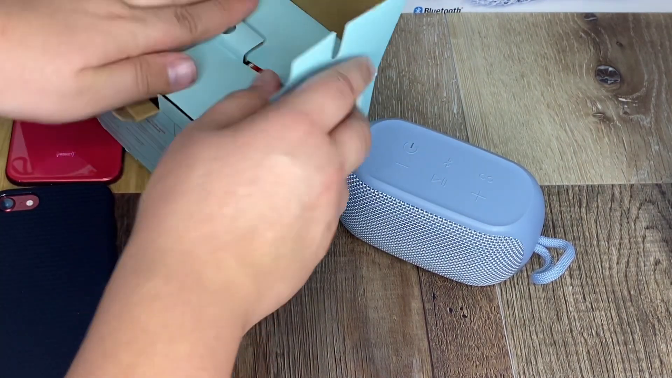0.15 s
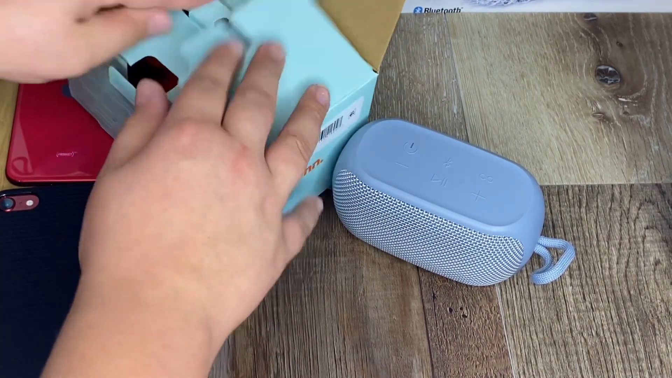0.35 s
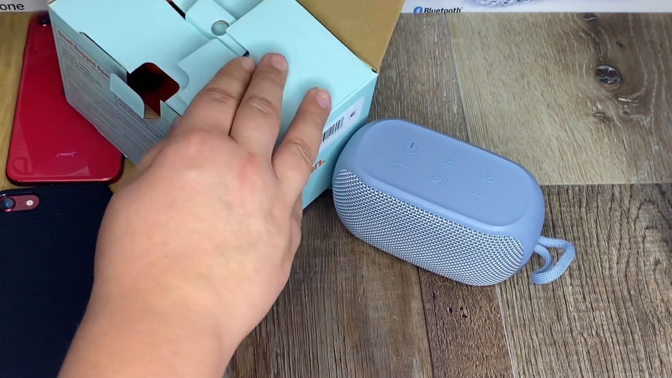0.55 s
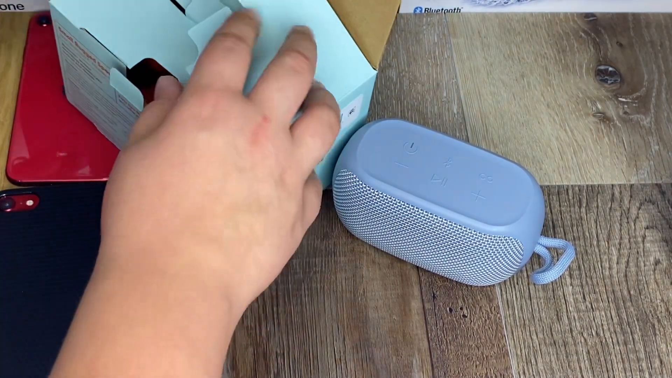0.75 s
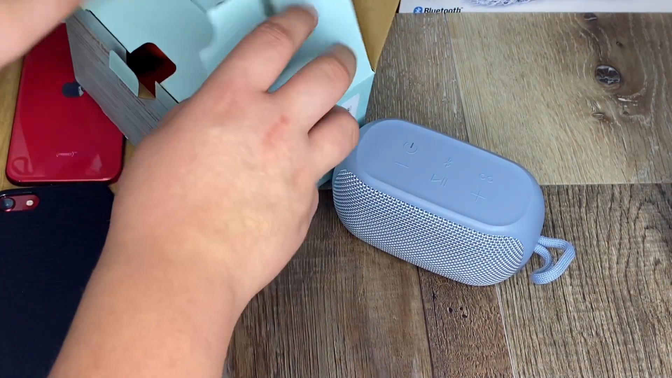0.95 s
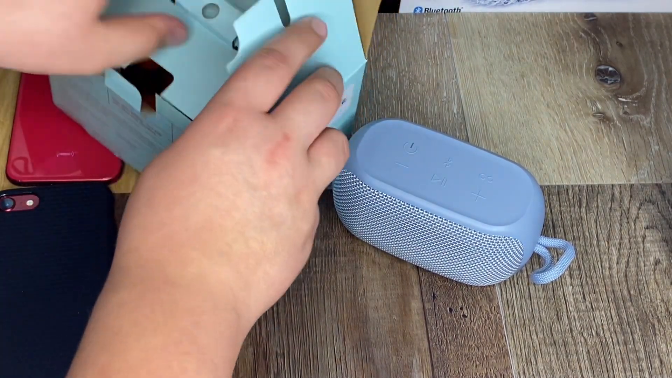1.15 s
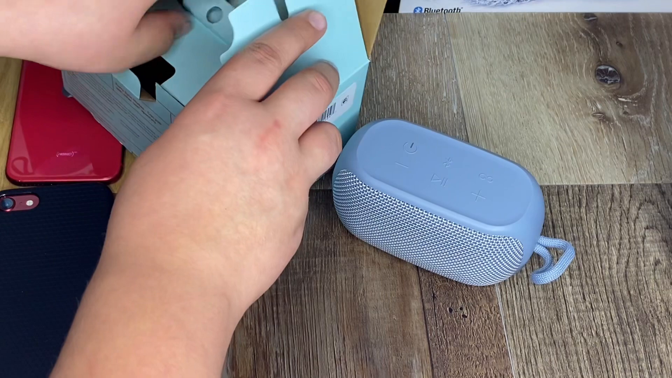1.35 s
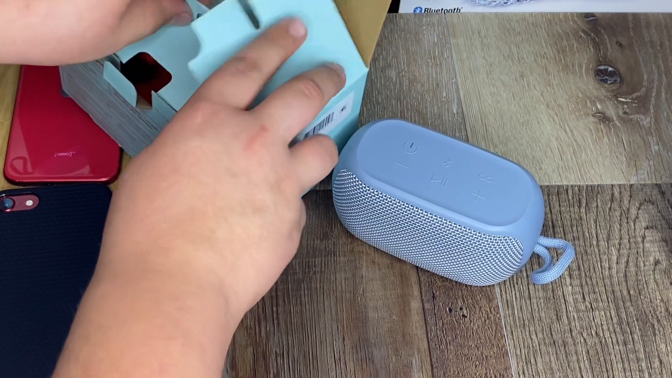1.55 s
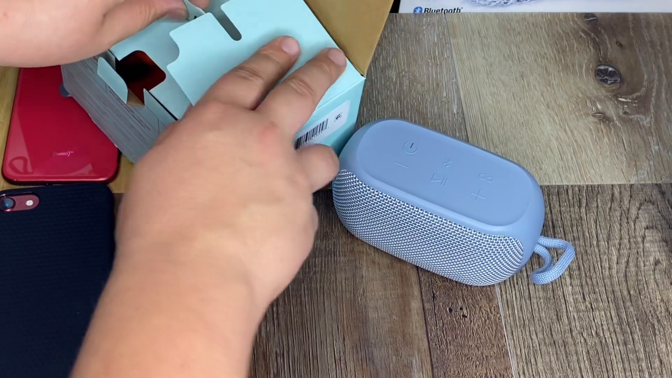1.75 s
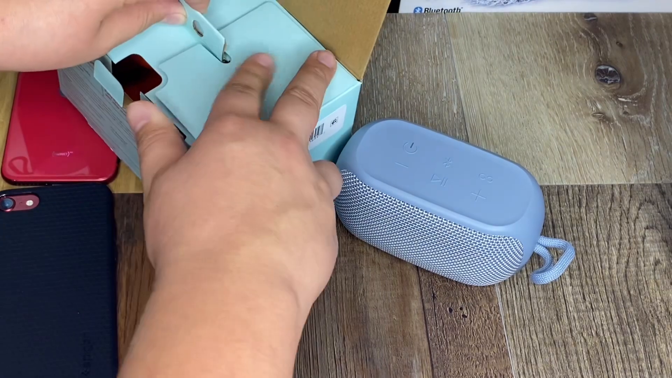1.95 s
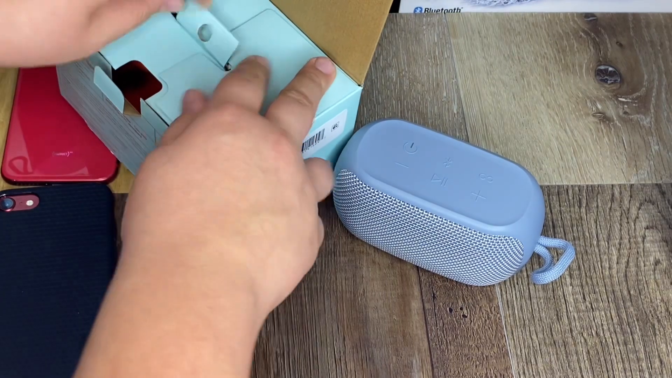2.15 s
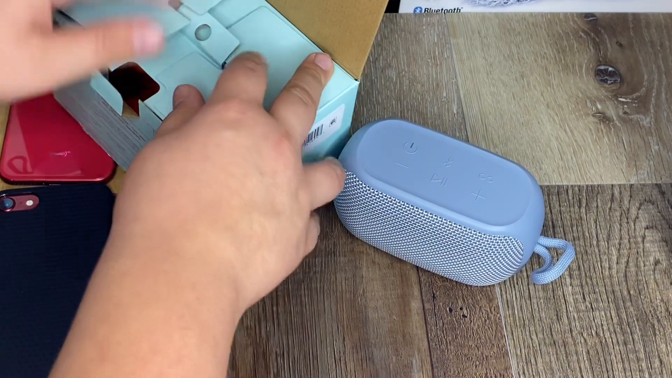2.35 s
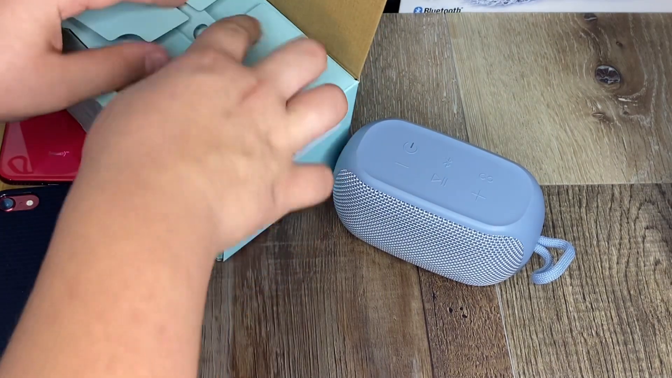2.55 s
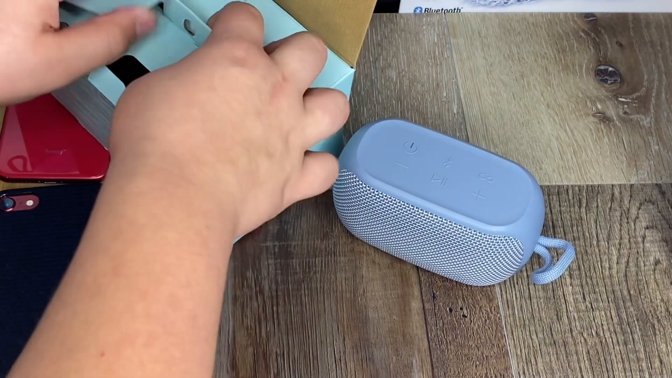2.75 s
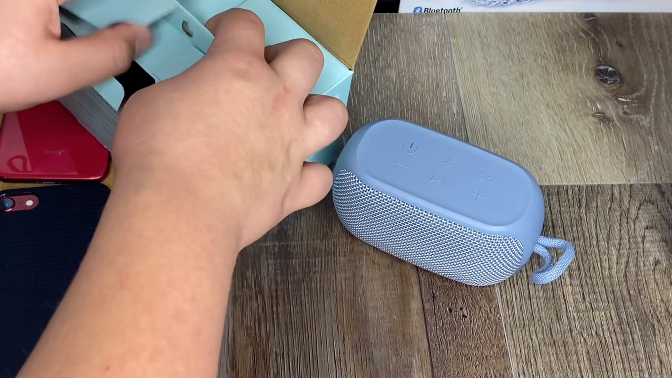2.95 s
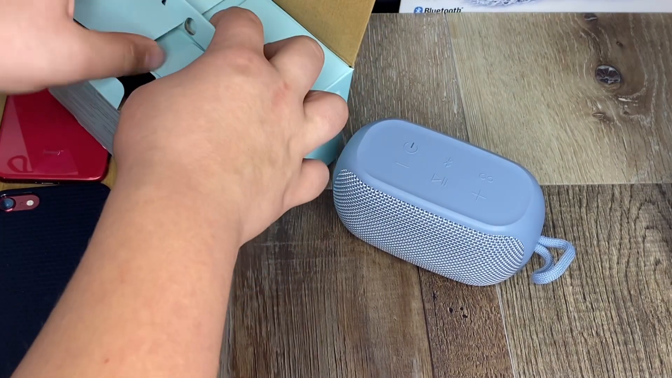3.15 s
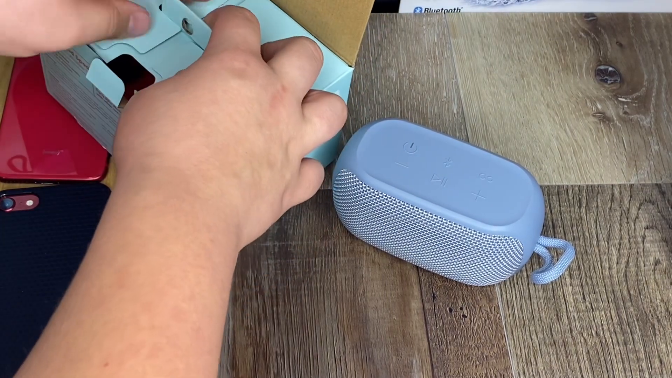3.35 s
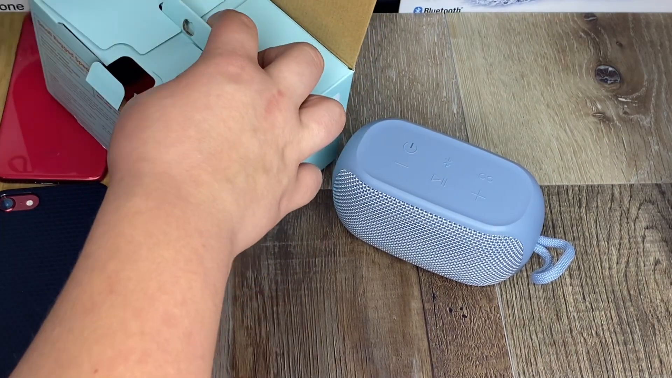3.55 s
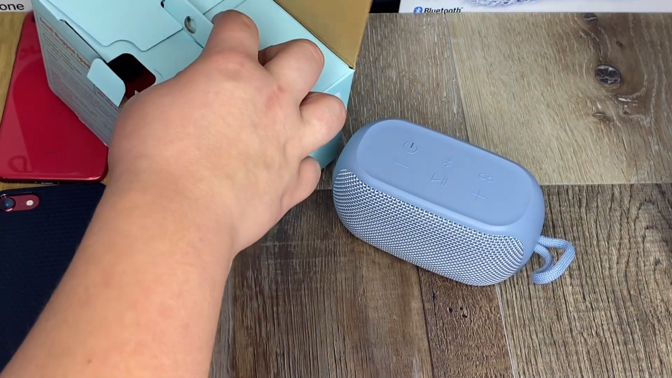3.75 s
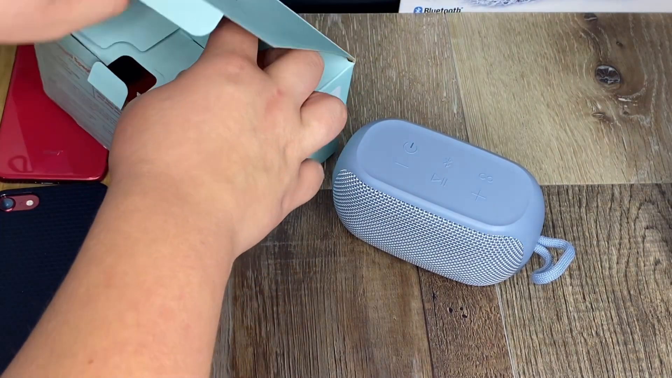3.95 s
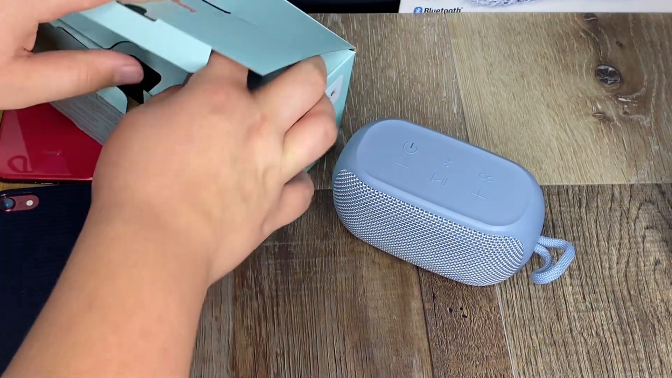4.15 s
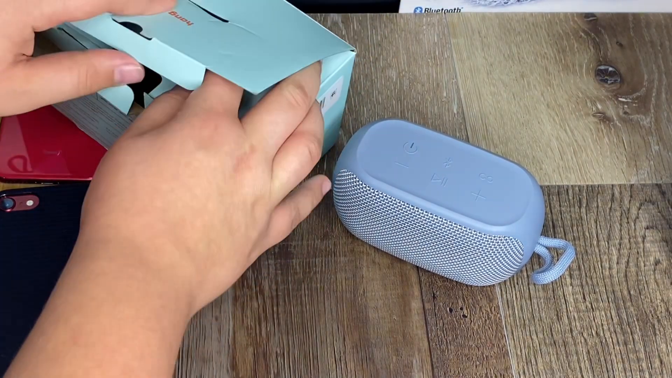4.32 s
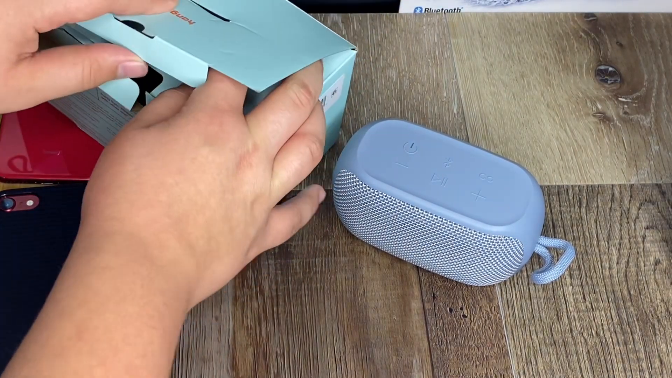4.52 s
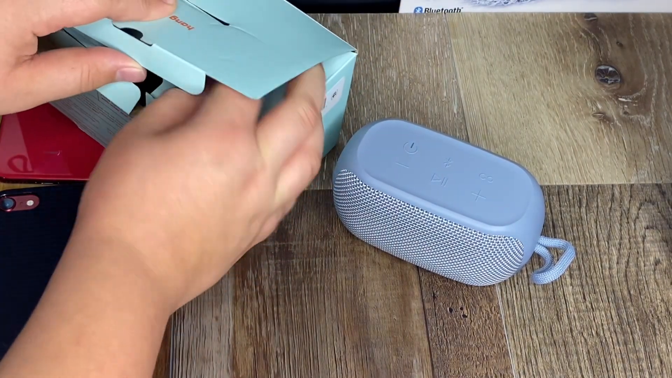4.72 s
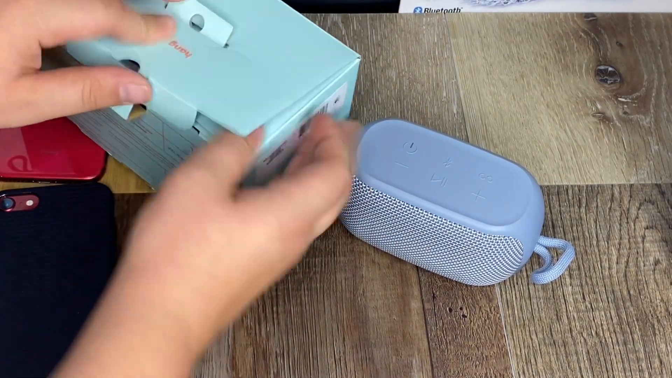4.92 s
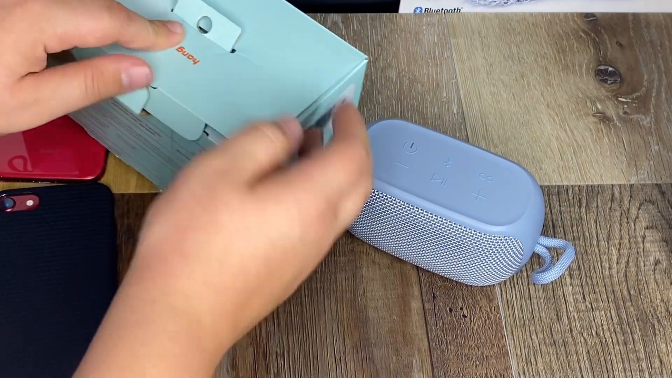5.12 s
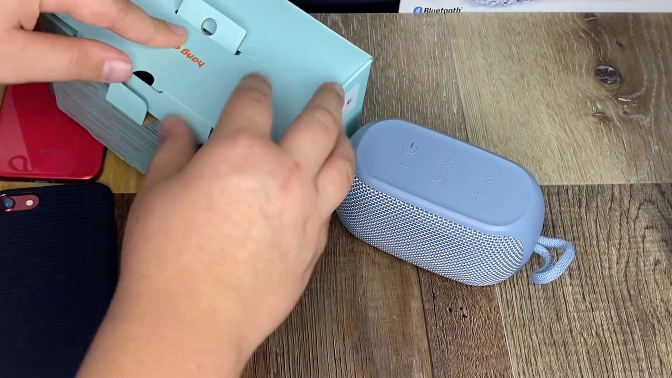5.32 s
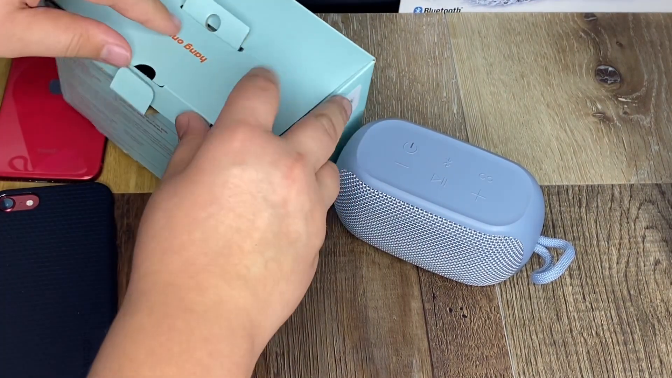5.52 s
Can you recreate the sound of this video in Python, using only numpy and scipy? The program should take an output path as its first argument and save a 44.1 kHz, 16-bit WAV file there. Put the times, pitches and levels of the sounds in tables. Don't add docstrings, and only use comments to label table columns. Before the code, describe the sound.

Close, dry cardboard rustling with small pops and hollow taps, a quiet fumbling pause, then a loud lid slap and faint creaks.

```python
import sys
import numpy as np
from scipy import signal
from scipy.fft import rfft, irfft, next_fast_len
from scipy.io import wavfile

SR = 44100
rng = np.random.default_rng(int(sys.argv[2]) if len(sys.argv) > 2 else 0)


def magnitude_from_level(level_db):
    exponent = np.asarray(level_db, float) / 20
    return 10 ** exponent


def wav_out(sig):
    wavfile.write(sys.argv[1], SR, np.round(np.clip(np.atleast_2d(sig).T, -1, 1) * 32767).astype(np.int16))


N = 250488


def rms_one(x):
    return x / np.sqrt(np.mean(x ** 2) + 1e-20)


def at_hz(points, hz):
    table_hz, values = np.array(points)[:, :2].T
    return np.interp(np.log(hz + 1), np.log(table_hz), values)


def colour(x, points):
    size = next_fast_len(len(x))
    gain = magnitude_from_level(at_hz(points, np.fft.rfftfreq(size, 1 / SR)))
    return irfft(rfft(x, size) * gain, size)[:len(x)]


def resonance(x, hz, width_hz):
    r = np.exp(-np.pi * width_hz / SR)
    poles = [1, -2 * r * np.cos(2 * np.pi * hz / SR), r * r]
    return signal.lfilter([(1 - r * r) / 2, 0, (r * r - 1) / 2], poles, x)


def body(x, modes):
    out = 0
    for k, (hz, width_hz, level_db) in enumerate(modes):
        out = out + (-1) ** k * magnitude_from_level(level_db) * resonance(x, hz, width_hz)
    return out


def drift(rate_hz):
    r = np.exp(-2 * np.pi * rate_hz / SR)
    wander = signal.lfilter([1], [1, -2 * r, r * r], rng.standard_normal(N + SR))
    return rms_one(wander[SR:])


def grains(per_s, spread_db, clump_db, clump_rate):
    sizes = magnitude_from_level(spread_db * np.minimum(rng.exponential(1, N), 4)) * rng.choice([-1, 1], N)
    slips = rng.random(N) < per_s / SR
    return sizes * slips * magnitude_from_level(clump_db * drift(clump_rate)) + 1e-18


def add(out, start_s, peak_db, sound):
    i = round(start_s * SR)
    piece = sound[:N - i]
    out[..., i:i + len(piece)] += np.multiply.outer(magnitude_from_level(peak_db) / np.max(np.abs(sound)), piece)


def burst(carrier, length_ms, rise):
    t = np.arange(len(carrier)) / (SR * max(length_ms, 0.4) / 1000)
    return carrier * (1 - np.exp(-(t / rise) ** 2)) * np.exp(-t * 1.12)


def strokes(rows, power_db, fade_db_per_s):
    start_s, hold_s = np.transpose(rows)[:2, :, None]
    t = np.arange(0, N + 64, 64) / SR - start_s
    grip = np.clip(t / 0.014, 0, 1)
    shape = grip * magnitude_from_level(power_db[:, None] - fade_db_per_s * np.maximum(t - hold_s, 0))
    return shape ** 2 + 1e-14


def spread(slow):
    return np.interp(np.arange(N) / 64, np.arange(len(slow)), slow)


# pitch_hz, level_db (per Hz)
AIR = [(25, -21), (38, -30), (59, 0), (102, -23), (114, -1), (206, -28.5), (775, -33.5), (840, -46),
       (2200, -41), (4500, -52), (16000, -62)]
# pitch_hz, width_hz, level_db, steady_share
HUM = [(58, 14, -61, .3), (91.3, 5, -56.5, 2.2)]


def background():
    out = magnitude_from_level(-63.5) * rms_one(colour(rng.standard_normal(N), AIR))
    for hz, width_hz, level_db, steady in HUM:
        flutter = rms_one(resonance(rng.standard_normal(N + SR), hz, width_hz)[SR:])
        tone = np.sin(2 * np.pi * hz * np.arange(N) / SR)
        out += magnitude_from_level(level_db) * rms_one(flutter + steady * tone)
    return out


# pitch_hz, t60_s
ROOM_T60 = [(100, 0.55), (500, 0.33), (2000, 0.25), (6000, 0.17), (14000, 0.15)]


def room(x, onset_s):
    t, tail = np.arange(SR * 3 // 4) / SR, 0
    for hz in 45 * 2. ** np.arange(9):
        octave = signal.butter(2, [hz / np.sqrt(2), hz * np.sqrt(2)], "band", fs=SR, output="sos")
        decay = magnitude_from_level(-60 * t / at_hz(ROOM_T60, hz) - 0.51 * np.log2(hz / 500))
        tail = tail + signal.sosfilt(octave, rng.standard_normal(len(t))) * decay
    tail = tail * (1 - np.exp(-t / onset_s))
    return signal.fftconvolve(x, tail / np.sqrt(np.sum(tail ** 2)))[:N]


def scatter(x, spread_s):
    t = np.arange(SR // 20) / SR
    echoes = rfft(rng.standard_normal(len(t)) * np.exp(-t / spread_s), N)
    lag = np.tanh(2 * np.cos(np.angle(echoes)))
    moving = 0.35 + 0.74 * np.tanh(2 * drift(7.8))
    return moving * irfft(1j * rfft(x) * lag, N)


# start_s, peak_db, pitch_hz, t60_s
THUMPS = [(0.08, -46, 127, 0.2), (0.963, -48, 91, 0.25), (1.124, -45, 145, 0.32), (1.879, -44.5, 106, 0.11),
          (2.167, -37, 138, 0.057), (2.341, -41, 143, 0.28), (3.257, -48.5, 147, 0.41),
          (3.71, -31.5, 138.7, 0.16), (3.843, -35.5, 171, 0.2), (4.697, -44, 134, 0.71),
          (4.925, -49, 156, 0.21),
          (1.26, -51, 137, 0.12),
    (1.896, -47, 56.7, 0.13),
    (3.719, -44, 51.8, 0.32),
    (3.873, -40, 44.8, 0.1),
    (4.932, -29.5, 112.4, 0.11),
    (4.952, -34.5, 55, 0.065),
]


def thumps():
    out, t = np.zeros(N), np.arange(SR // 2) / SR
    for start_s, peak_db, hz, t60_s in THUMPS:
        swell = 1 - np.exp(-t / 0.007)
        decay = magnitude_from_level(-60 * t / max(t60_s, 0.03))
        add(out, start_s, peak_db, np.sin(2 * np.pi * hz * t) * swell * decay)
    return out


# start_s, hold_s, level_db, pitch_hz, width_hz
SLIDES = [(-.01, 0.057, -45, 2500, 900), (0.81, 0.018, -64, 5270, 400), (1.844, 0.023, -48, 4700, 400),
          (2.151, 0.021, -46, 2560, 500), (2.331, 0.025, -42.5, 1300, 448), (2.957, .03, -65, 5470, 300),
          (3.067, 0.069, -55, 4240, 1400), (3.36, 0.031, -51.5, 7600, 900), (3.48, 0.13, -77.5, 1890, 1180),
          (3.884, 0.036, -47, 2750, 400), (3.954, 0.09, -64, 4700, 400), (4.872, 0.025, -46.5, 6500, 694),
          (4.963, 0.1, -54.5, 2180, 1800), (5.145, 0.027, -58.5, 4500, 700), (5.23, 0.078, -64, 4440, 500)]


def slides():
    powers = strokes(SLIDES, np.transpose(SLIDES)[2], fade_db_per_s=840)
    fine = grains(9000, spread_db=1.5, clump_db=3.5, clump_rate=40)
    out = np.zeros(N)
    for (_, _, _, hz, width_hz), power in zip(SLIDES, powers):
        patch = resonance(resonance(fine, hz, width_hz), hz, 2 * width_hz)
        out += spread(np.sqrt(power)) * rms_one(patch)
    return out


# pitch_hz, width_hz, level_db
BOX = [(285, 89, -2), (350, 80, 2.5), (430, 148, -1.5), (500, 43, -4.5), (593.5, 66, -1.5), (804, 55, -2.5),
       (875, 105, -6), (145, 23, -5.5)]


def box_air(x):
    return body(x, BOX)


# pitch_hz, level_db
PAPER = [(900, 5.5), (1500, -2), (2500, -6), (4000, -22.5), (6000, -20), (8000, -24.5), (10000, 6)]


def fibres(clicks, centre_hz, cycles):
    pitches, dealt, out = np.geomspace(1000, 8000, 14), rng.integers(0, 14, N), 0
    for k, hz in enumerate(pitches):
        near_db = 7 * np.exp(-(np.log2(hz / centre_hz) / 0.66) ** 2)
        gain = magnitude_from_level(at_hz(PAPER, hz) + near_db + 3.66 * drift(6.4)) * np.sqrt(hz)
        out = out + gain * resonance(clicks * (dealt == k) + 1e-18, hz, hz / cycles)
    return out


# start_s, hold_s, wall_db, face_db, scrape_centre_hz
STROKES = [(-.02, 0.061, -42, -49, 2600), (.072, 0.025, -37, -43, 3360), (.132, 0.089, -40.5, -50, 3000),
           (0.218, 0.073, -37.5, -50.5, 2960), (.3, 0.1, -46.5, -50.5, 2660), (.4, 0.094, -65, -65, 2460),
           (0.558, 0.31, -62, -69.5, 4470), (0.848, 0.49, -49, -52.5, 2710),
           (1.125, 0.08, -36.5, -48, 3590), (1.307, 0.31, -51.5, -59.5, 2800),
           (1.53, 0.13, -59, -54.5, 2580), (1.59, 0.029, -41.5, -56.5, 3000),
           (1.695, 0.2, -42.5, -50.5, 3270), (2.03, 0.1, -50, -63.5, 2380), (2.109, 0.087, -44, -47, 2770),
           (2.28, 0.058, -51.5, -60, 3000), (2.329, 0.057, -45, -48.5, 3220),
           (2.501, 0.22, -53.5, -61, 2450), (2.77, 0.079, -59.5, -74, 2600),
           (2.86, 0.059, -56, -74.5, 2400), (2.915, 0.016, -48.5, -67.5, 2510),
           (2.949, 0.08, -56.5, -60, 5260), (3.052, 0.14, -48, -50, 4290),
           (3.206, 0.056, -44.5, -57.5, 3480), (3.332, 0.067, -51.5, -58.5, 5520),
           (3.452, 0.0078, -60, -63, 2380), (3.5, 0.08, -77, -89.5, 1904)]
# start_s, hold_s, wall_db, face_db, scrape_centre_hz
LID_STROKES = [(3.696, 0.047, -45, -57.5, 2800), (3.763, 0.012, -33.5, -36, 2770),
               (3.816, 0.15, -43.5, -45.5, 2780), (4.074, 0.038, -44, -53.5, 2550),
               (4.162, 0.13, -48.5, -58.5, 2470), (4.489, 0.2, -54, -65, 2290),
               (4.687, 0.24, -47.5, -54.5, 2480), (4.826, 0.032, -40, -52, 6000),
               (4.9, 0.021, -34.5, -43.5, 2810), (4.911, 0.036, -31.5, -38, 2410),
               (4.976, 0.067, -36.5, -53.5, 2500), (5.111, 0.045, -65, -55.5, 4500),
               (5.233, 0.15, -48.5, -56.5, 4090), (5.426, 0.11, -49, -58.5, 2500),
               (5.541, 0.044, -51.5, -57, 2500)]
# start_s, hold_s, hiss_db
BRUSHES = [(0.561, 0.097, -57), (1.945, 0.051, -54.5), (2.43, 0.077, -54), (2.616, 0.09, -58),
           (3.2, 0.066, -47.5), (3.36, 0.025, -52.5), (3.424, 0.014, -52), (3.995, 0.14, -54.5),
           (4.489, 0.022, -61.5), (4.685, .2, -54), (5.146, 0.079, -54.5), (5.587, 0.054, -55)]
# pitch_hz, width_hz, level_db
FLAPS = [(1500, 210, -1.5), (2140, 1580, 16), (2900, 91, 21.5), (3570, 700, -9.5), (4700, 1740, 9.5),
         (6000, 57, 1)]
# pitch_hz, level_db
HISS = [(6000, -5.5), (8000, -1), (10000, -5.5), (13000, -6.5), (17000, -3.5)]


def rubbing():
    rows = STROKES + LID_STROKES
    wall_db, face_db, hz = np.transpose(rows)[2:]
    hiss_db = face_db - 3.5 - 5.5 * np.log2(hz / 3000)
    walls = strokes(rows, wall_db, fade_db_per_s=138)
    faces = strokes(rows, face_db, fade_db_per_s=180)
    hisses = np.vstack([strokes(rows, hiss_db, fade_db_per_s=240),
                        strokes(BRUSHES, np.transpose(BRUSHES)[2], fade_db_per_s=240)])
    centre_hz = spread(hz @ faces / faces.sum(0))
    on_wall, on_face, on_hiss = [spread(np.sqrt(p.sum(0))) for p in (walls, faces, hisses)]

    clumps = magnitude_from_level(2.02 * drift(24))
    coarse = grains(1200, spread_db=1.0, clump_db=2.5, clump_rate=6.9)
    wall = rms_one(clumps * box_air(coarse))
    wall = signal.sosfilt(signal.butter(2, 1300, fs=SR, output="sos"), wall)
    fine = clumps * grains(4500, spread_db=2.2, clump_db=3.0, clump_rate=40)
    face = rms_one(fibres(fine, centre_hz, cycles=2.9)) + magnitude_from_level(-2.5) * rms_one(body(fine, FLAPS))
    finest = clumps * grains(13000, spread_db=-13.0, clump_db=1.1, clump_rate=18.0)
    hiss = rms_one(colour(finest, HISS))
    return magnitude_from_level(-0.5) * on_wall * wall + on_face * face + on_hiss * hiss


# start_s, peak_db, pitch_hz, length_ms
KNOCKS = [(0.083, -30.5, 650, 7.4), (0.1315, -28, 614, 4.6), (.175, -28.5, 624, 1.8),
          (0.312, -28, 420, 7.1), (0.358, -34.5, 660, 3.5), (0.638, -38, 586, 2), (0.847, -35.5, 604, 5.7),
          (0.973, -33, 525, 5.3), (1.084, -29.5, 745, 1.8), (1.134, -44.5, 650, 7.3),
          (1.1645, -24.5, 344, 8.8), (1.335, -30, 430, 1.7), (1.601, -39.5, 500, 6.5),
          (1.706, -43, 660, 5.2), (1.748, -23.5, 467, 1.44), (1.759, -37, 403, 1.9), (1.772, -34, 437, 3.1),
          (1.827, -26, 550, 2.5), (2.115, -29.5, 590, 3), (2.194, -34.5, 650, 3.9),
          (2.342, -20.5, 660, 1.2), (2.511, -39, 540, 3.4), (2.63, -43.5, 567, 6.3), (2.678, -39, 596, 14),
          (2.935, -43, 320, 6.2), (3.118, -41.5, 503, 6.4), (3.142, -39, 680, 4.2), (3.203, -38, 616, 5.2),
          (3.274, -30.5, 733, 3.7), (3.324, -33, 640, 3.7)]
# start_s, peak_db, pitch_hz, length_ms
LID_KNOCKS = [(3.711, -37, 453, 4), (3.782, -17.5, 630, 4.5), (3.872, -19.5, 410, 3),
              (4.244, -25.5, 533, 2.4), (4.297, -33, 428, 1.8), (4.446, -43, 629, 7.4),
              (4.593, -38, 626, 5.1), (4.696, -31.5, 303, 2.5), (4.717, -36, 460, 2.1),
              (4.804, -31.5, 693, 5.3), (4.898, -34, 818, 6.5), (4.926, -6.5, 541, 4.7),
              (5.143, -32.5, 480, 3.7), (5.245, -35.5, 663, 10.4), (5.3139, -31, 333, 2),
              (5.3623, -33.5, 350, 2.8), (5.411, -35.5, 627, 4.7), (5.4533, -32.5, 331, 2.3),
              (5.52, -39, 330, 4.1), (5.536, -37, 310, 3.3), (5.5566, -32, 530, 3.6), (5.575, -38, 787, 15)]
# start_s, peak_db, pitch_hz, length_ms
LID = [
    (4.927, -13, 393, 7),
    (4.9375, -14.5, 397, 2.6),
    (4.9437, -18, 430, 2.2),
    (4.975, -26, 554, 7.2),
    (5.085, -32, 607, 21),
    (5.2793, -35.5, 350, 2.2),
    (5.426, -30, 350, 1.2),
    (5.596, -43, 890, 4.3),
    (2.695, -43, 606, 7.3),
    (2.783, -46, 600, 6.9),
]
# start_s, peak_db, pitch_hz, length_ms
MORE_KNOCKS = [(.012, -38, 744, 2.9), (.025, -29, 600, 1.7), (.094, -29, 610, 4.4), (.324, -29.5, 430, 1.2),
               (1.247, -31, 300, 4.8), (.566, -52, 616, 2.8), (.652, -41, 627, 9.1), (0.885, -51, 636, 2.5),
               (1.466, -43.5, 600, 7.3), (1.524, -47, 638, 4.5), (1.617, -36, 517, 4), (1.668, -38, 558, 4.1),
               (2.038, -48, 304, 3.6), (2.162, -33.5, 350, 1.9), (.974, -36.5, 270, 8), (2.906, -52, 616, 4.6),
               (3.025, -52, 595, 3.1), (3.24, -40.5, 557, 6.6), (3.457, -44.5, 624, 4.3),
               (3.882, -18.5, 613, 1.54), (4.095, -60, 592, 4.5), (4.14, -36, 544, 1.5), (4.207, -43, 502, 4),
               (4.231, -35.5, 557, 4.2), (4.402, -48, 412, 2), (4.48, -47.5, 666, 12.5), (4.546, -49, 663, 4.8),
               (4.675, -44.5, 497, 3.5), (4.838, -38, 500, 2.9), (5.04, -29, 556, 3.5), (5.178, -43, 538, 8.8),
               (5.261, -34, 609, 6.1), (5.486, -41, 589, 5.1), (5.586, -36.5, 430, 2.2), (5.606, -35.5, 900, 3.8)]


def knocks():
    out, t = np.zeros(N), np.arange(4096) / SR
    soft = signal.butter(2, 1200, fs=SR, output="sos")
    for start_s, peak_db, hz, length_ms in KNOCKS + LID_KNOCKS + LID + MORE_KNOCKS:
        swing = signal.sosfilt(soft, burst(np.sin(2 * np.pi * hz * t), length_ms, rise=0.34))
        puff = burst(rng.standard_normal(len(t)), length_ms, rise=0.82)
        air = box_air(signal.sosfilt(soft, puff))
        add(out, start_s - 0.0002, peak_db + 1.5, rms_one(swing) + magnitude_from_level(-7) * rms_one(air))
    return out


def snaps(rows, ring_db, crack_db):
    out = np.zeros(N)
    edge = signal.butter(2, [900, 9000], "band", fs=SR, output="sos")
    treble = signal.butter(4, 11000, "high", fs=SR, output="sos")
    for start_s, peak_db, hz, length_ms in rows:
        noise, start_s = rng.standard_normal(2048), start_s - 0.001
        hit = burst(noise, length_ms, rise=0.64)
        sharp = burst(noise, length_ms / 2, rise=0.55)
        add(out, start_s, peak_db + ring_db, resonance(hit, hz, 340))
        add(out, start_s, peak_db + ring_db - 27.5, resonance(hit, hz * 1.38, 310))
        add(out, start_s, peak_db + crack_db, signal.sosfilt(edge, hit))
        add(out, start_s, peak_db + crack_db / 2 - 18, signal.sosfilt(treble, sharp))
    return out


# start_s, peak_db, pitch_hz, length_ms
TICKS = [(0.074, -30.5, 2140, 3.6), (0.1745, -39.5, 2520, 1.7), (0.0839, -28.5, 2310, 3.6),
         (0.097, -34, 3000, 1.2), (0.3186, -41, 2870, 1.3), (0.3852, -37, 6000, 0.89),
         (1.164, -23.5, 1360, 1.8), (.476, -46, 1770, 3.5), (0.567, -55, 2000, 2), (.634, -50.5, 2800, 1.9),
         (.788, -57, 3280, 2.6), (1.173, -32, 1800, 1.3), (1.2245, -22, 3800, 2.58),
         (1.617, -36, 2200, 2.6), (1.669, -54, 2000, 1.5), (1.889, -37, 2480, 1.2),
         (2.0363, -46.5, 2540, 1.5), (2.0666, -60, 2560, 1.5), (2.082, -47, 2730, 2),
         (2.102, -43, 2620, 1.1), (2.1845, -31.5, 2590, 3.6), (2.6123, -51, 4800, 1.2),
         (2.6214, -51.5, 2030, 1.5), (2.8115, -58.5, 2950, 1.5), (2.827, -55, 2800, 1.4),
         (2.851, -55, 2500, 1.2), (2.8808, -59, 2000, 1.2), (2.888, -55, 2860, 1.5),
         (1.2249, -13.5, 2610, 2), (2.9394, -53, 2590, 1.5), (3.0235, -55.5, 2180, 2),
         (3.1946, -42, 2080, 1), (3.2101, -50, 2080, 1.5), (3.327, -33, 4030, 2.9),
         (3.351, -39.5, 2250, 1.5), (4.2, -48.5, 5300, 2), (4.594, -56, 2200, 1.7), (4.613, -50, 2490, 2.3),
         (4.7152, -38, 2200, 2.3), (4.9241, -20, 4580, 2.4), (5.1684, -44, 2140, 2.1),
         (5.2626, -46, 2700, 1.5), (5.277, -43, 2400, 1.5), (5.312, -44.5, 2400, 2),
         (5.423, -57, 2350, 1.5), (5.451, -51, 2330, 1.3), (5.4887, -59, 2320, 2), (5.5237, -49, 2700, 1.7),
         (5.535, -48, 2500, 1.3), (5.574, -45, 3000, 1.5)]


def fibre_ticks():
    return snaps(TICKS, ring_db=-2.0, crack_db=-4.0)


# start_s, peak_db, pitch_hz, length_ms
SNAPS = [(0.086, -37, 2730, 8.7), (0.1747, -31.5, 2110, 3), (0.314, -35, 2690, 2.1),
         (0.383, -37, 2250, 2.5), (0.843, -45, 2120, 3.7), (0.948, -39, 4040, 4.8),
         (1.0848, -33.5, 2230, 2.5), (1.152, -30, 2040, 1.4), (1.16, -26.5, 2180, 4.5),
         (1.204, -32, 2660, 2.3), (1.223, -20, 2670, 2.4), (1.236, -22.5, 2240, 5.4),
         (1.332, -36, 3820, 3.5), (1.7143, -33, 1760, 1.4), (1.747, -17, 2590, 1.8),
         (1.757, -24, 2480, 2.5), (1.8262, -29, 2330, 3.9), (1.875, -25, 2420, 2.8),
         (2.284, -39.5, 2300, 4.4), (2.324, -36.5, 3060, 2.4), (3.045, -47, 3600, 6.7),
         (3.276, -26, 4000, 0.82), (3.871, -12, 2210, 4), (4.294, -35.5, 1930, 2.45),
         (4.376, -43, 2850, 3.5), (4.6956, -32, 2060, 1.64), (4.8012, -29.5, 1620, 3.1),
         (4.896, -30, 2840, 7.9), (5.413, -48, 2250, 12), (5.5525, -48, 2760, 2.3)]
# start_s, peak_db, pitch_hz, length_ms
CRACKS = [(0.0737, -30, 4750, 2.2), (0.13, -21.5, 1500, 3.1), (0.215, -42, 2060, 11),
          (0.375, -35, 2610, 1.16), (0.9709, -29, 1800, 3.1), (1.142, -33.5, 2210, 0.8),
          (1.524, -51, 2220, 4.1), (1.6032, -34, 2040, 1.6), (1.8683, -34, 4560, 5.3),
          (2.1175, -33, 2000, 3.1), (2.3413, -21, 2170, 1.5), (2.547, -41.5, 3040, 3.5),
          (2.706, -46, 4700, 3.6), (2.968, -46, 5140, 9.5), (3.137, -40.5, 5470, 5.9),
          (3.242, -38.5, 1720, 2.2), (3.2609, -33, 2080, 4.3), (3.322, -31.5, 1760, 4.6),
          (3.7, -39.5, 5920, 1.7), (3.7082, -38.5, 5440, 0.78), (3.776, -23.5, 2550, 6.8),
          (3.8169, -20.5, 2110, 3.3), (3.8278, -18, 2880, 1.4), (3.843, -27.5, 5230, 1.3),
          (3.8697, -17.5, 4340, 2), (4.236, -39.5, 1600, 3.9), (4.8578, -33.5, 2700, 1.7),
          (4.897, -31, 6360, 1.7), (4.9243, -14.5, 2260, 4.7), (5.583, -42, 2230, 2.1)]


def creases():
    return snaps(SNAPS, ring_db=-1.5, crack_db=-17.5) + snaps(CRACKS, ring_db=-4.5, crack_db=0)


# pitch_hz, level_db
ROOM_TONE = [(100, 0.5), (140, 2), (220, -6), (430, 1), (780, -8), (1300, -1), (2700, -5), (5000, -1)]
# pitch_hz, side_db
WIDTH = [(30, -36.5), (110, -18.5), (270, -20.5), (500, -3.5), (900, -6.5), (1500, -3.5), (2000, -8.5),
         (2500, -30.5), (7000, -29.5), (9500, -18.5), (16000, -13.5)]


def scene():
    dry = rubbing() + creases() + knocks() + thumps() + fibre_ticks() + slides()
    mid = dry + magnitude_from_level(-11) * colour(room(dry, onset_s=0.0005), ROOM_TONE) + background()
    side = magnitude_from_level(5.5) * scatter(dry, spread_s=0.0016)
    side += magnitude_from_level(-6.5) * room(dry, onset_s=0.0018) + background()
    side = colour(side, WIDTH)
    return np.array([mid + side, mid - side])


# pitch_hz, left_minus_right_db
LEAN = [(100, 0), (250, .6), (500, 4), (700, 4.2), (1100, .7), (4000, 0)]


def microphone(dry):
    size = next_fast_len(N)
    hz = np.fft.rfftfreq(size, 1 / SR)
    turns = np.clip((hz - 6770) / 4360, 0, 2)
    turn = np.exp(1j * np.pi * turns - 0.25j * 0.56 * np.sin(4 * np.pi * turns))
    turn = turn * magnitude_from_level(-at_hz(LEAN, hz) / 2)
    top = magnitude_from_level(np.interp(hz, [20, 42, 15650, 15900, 16600, 16900], [-14, 0, 0, -36, -38, -70]))
    return irfft(rfft(dry, size) * top * np.array([1 / turn, turn]), size)[:, :N]


def band_limit(x):
    return signal.sosfilt(signal.butter(12, 17010, fs=SR, output="sos"), x)


def record(dry):
    ports = microphone(dry)
    ports = 1.3 * np.tanh(ports / 1.3)
    return band_limit(ports)


dry = scene()
out = record(dry)
wav_out(out)
```